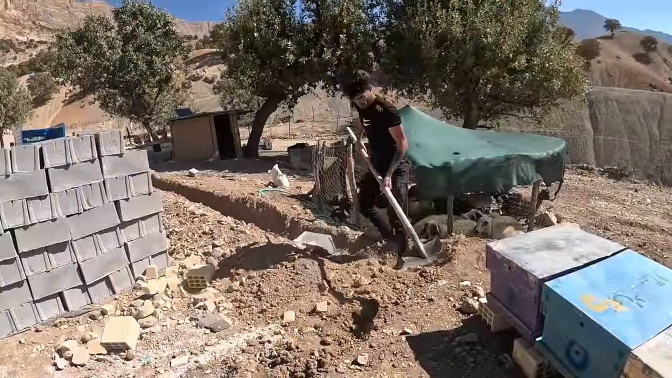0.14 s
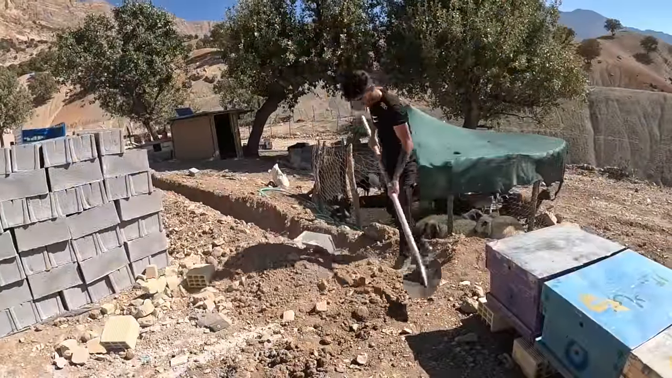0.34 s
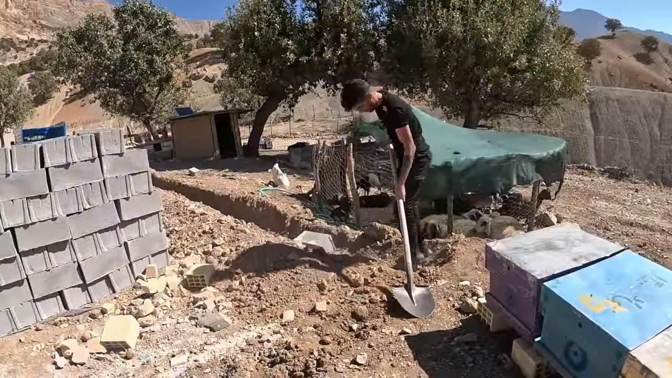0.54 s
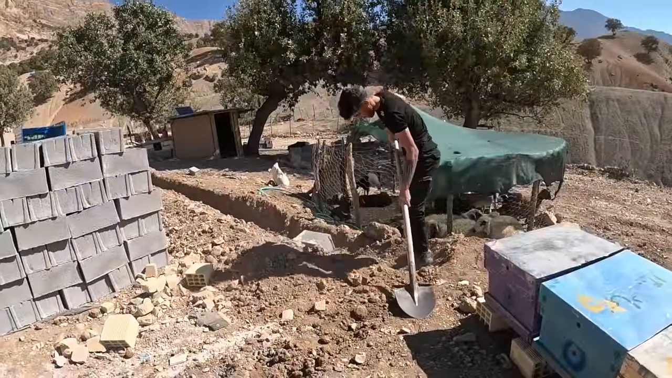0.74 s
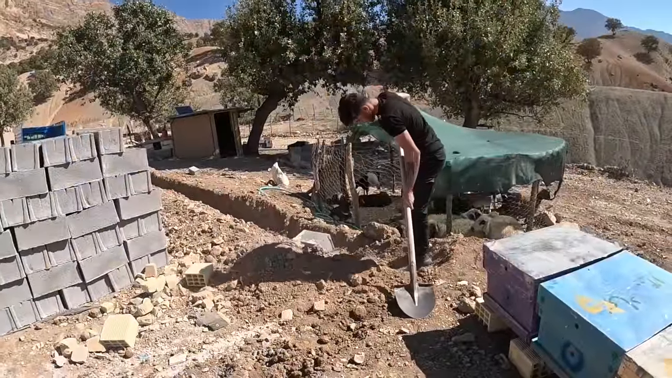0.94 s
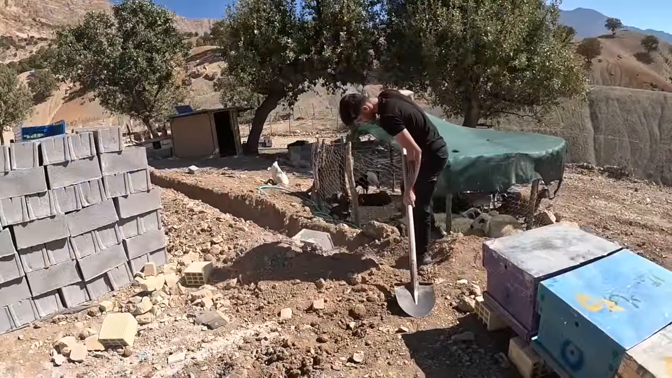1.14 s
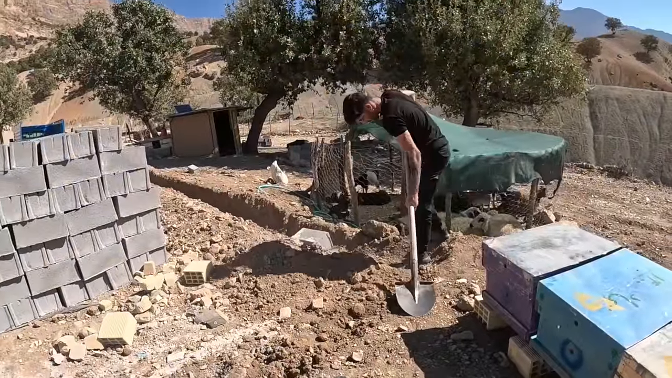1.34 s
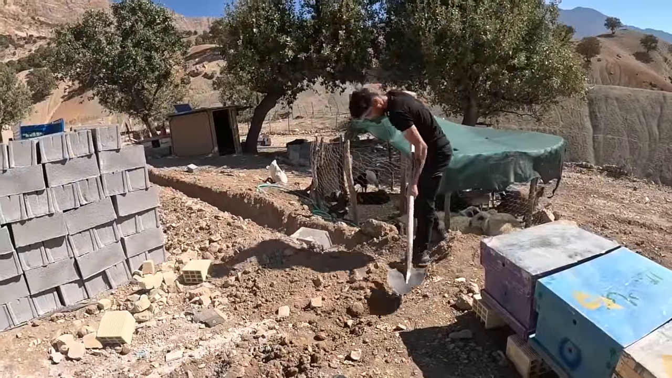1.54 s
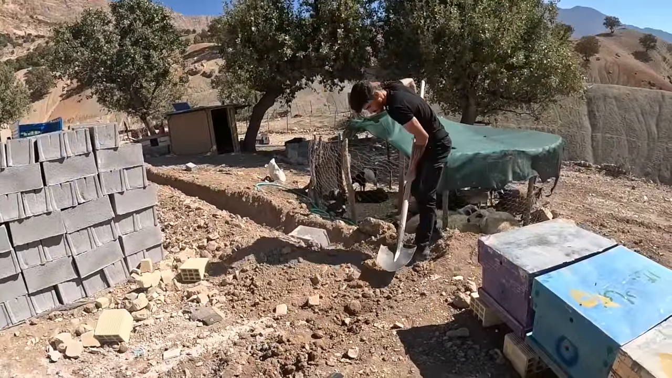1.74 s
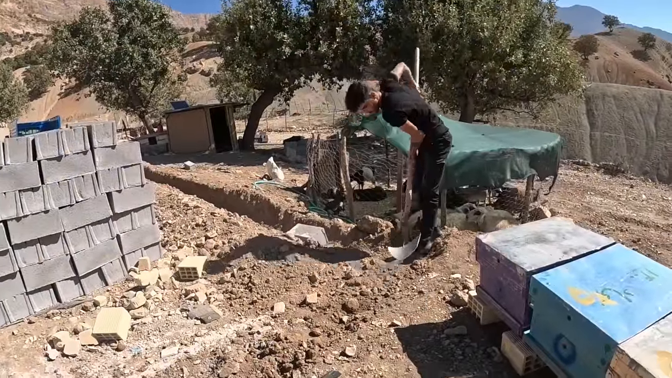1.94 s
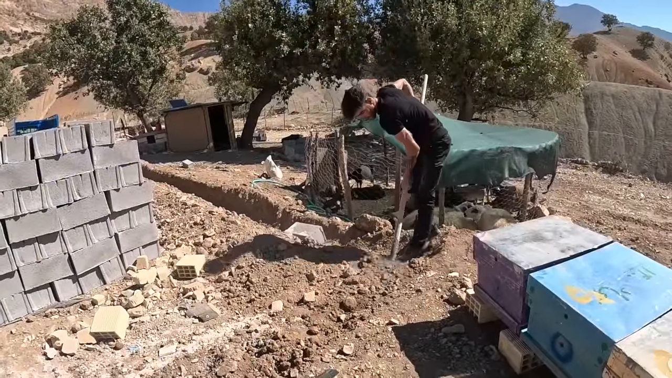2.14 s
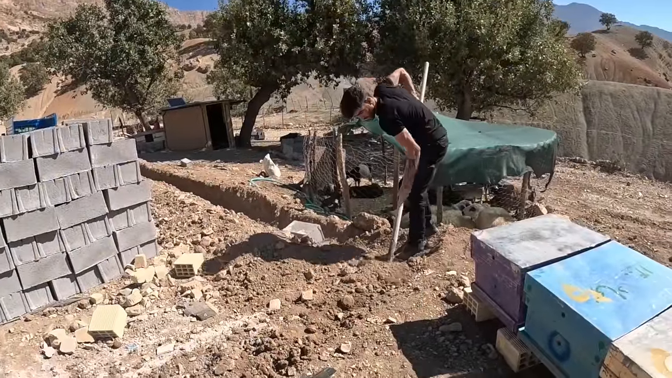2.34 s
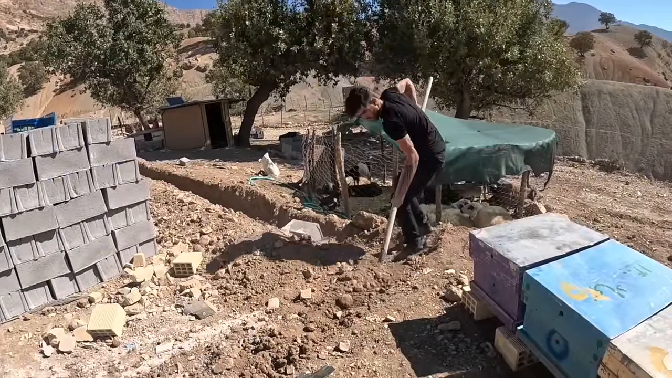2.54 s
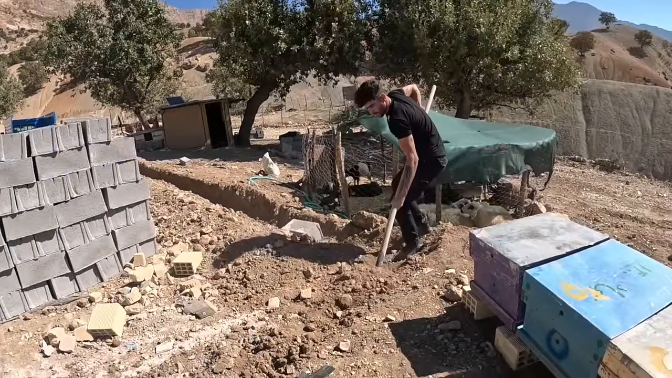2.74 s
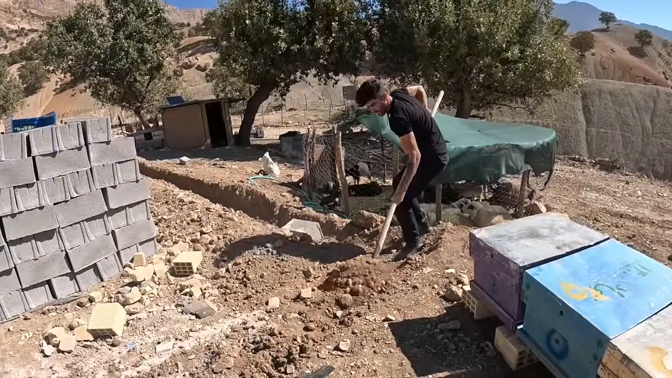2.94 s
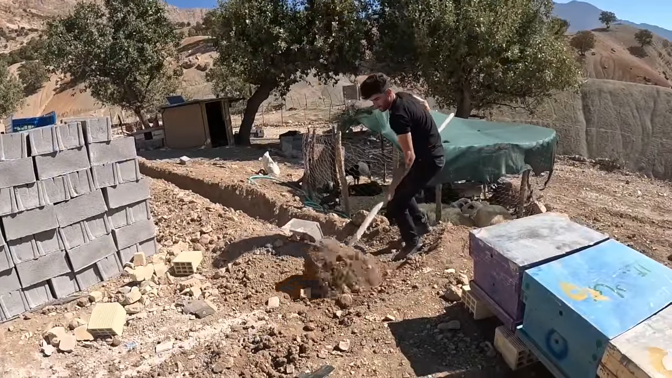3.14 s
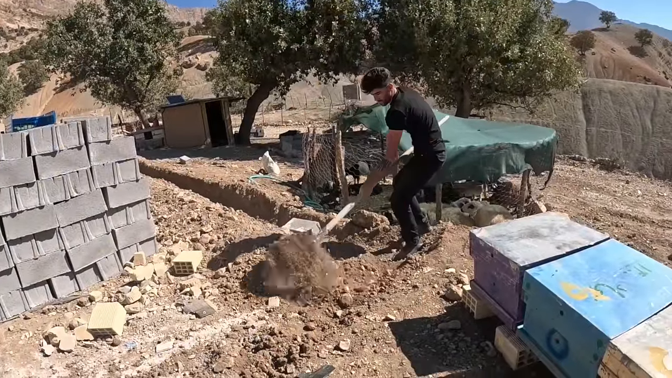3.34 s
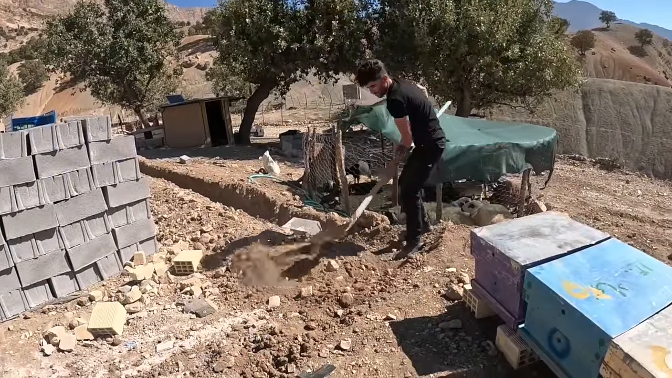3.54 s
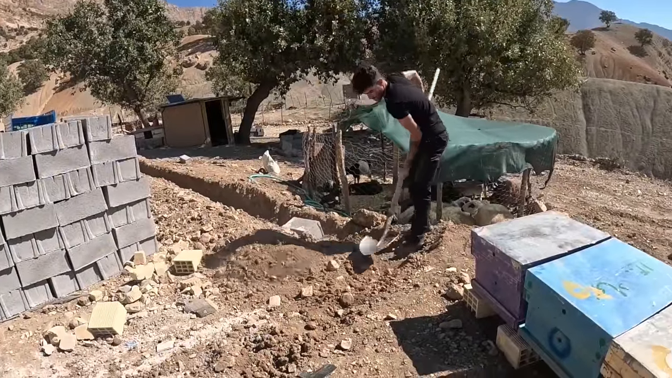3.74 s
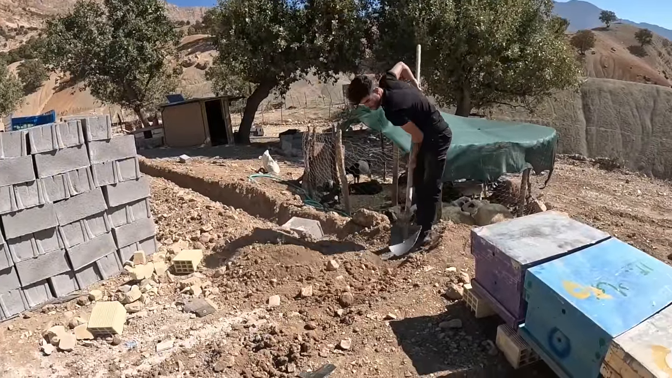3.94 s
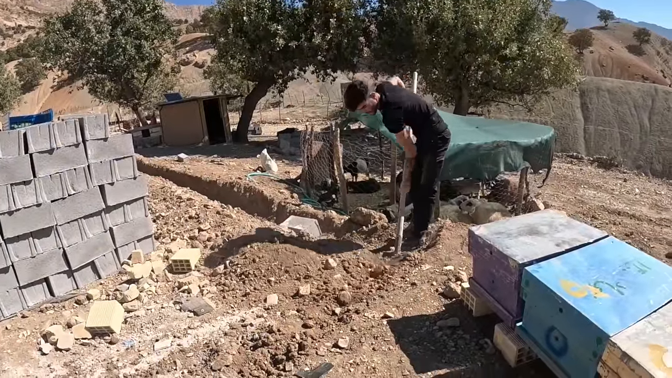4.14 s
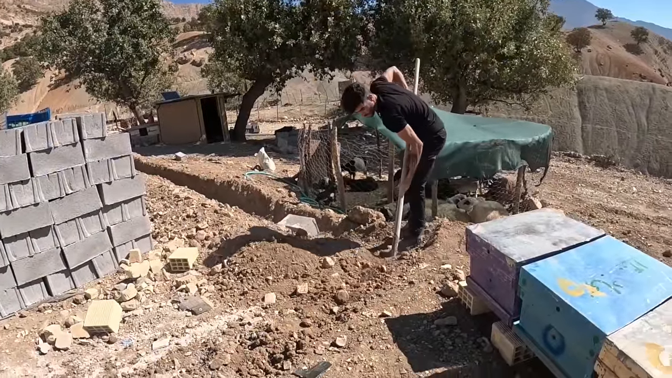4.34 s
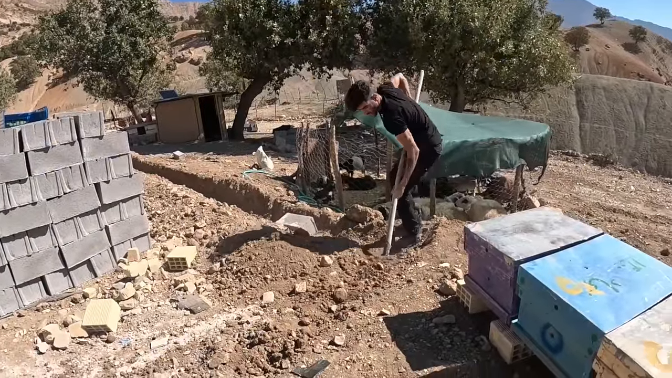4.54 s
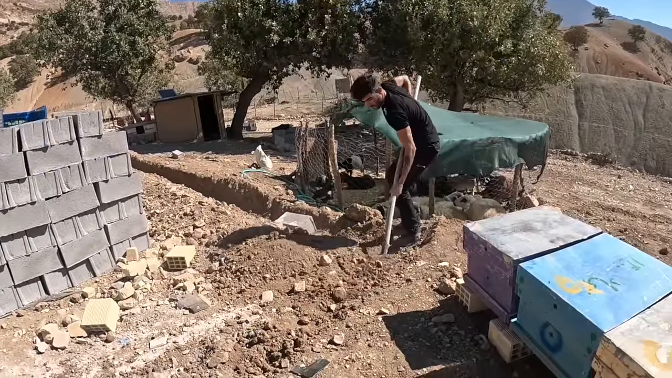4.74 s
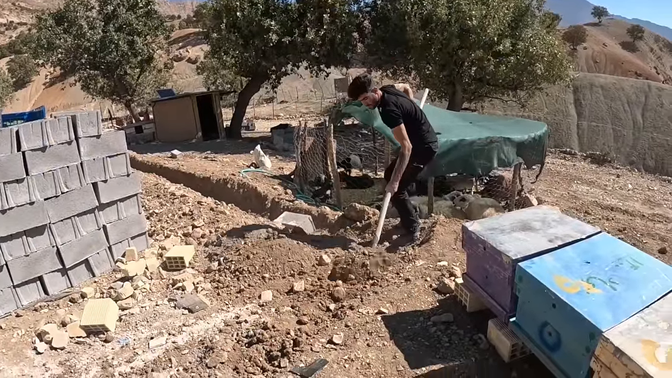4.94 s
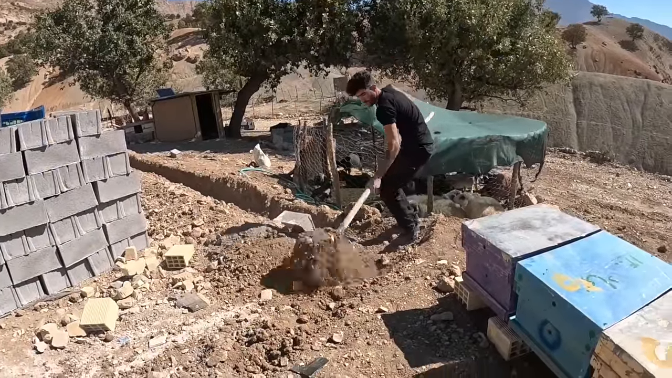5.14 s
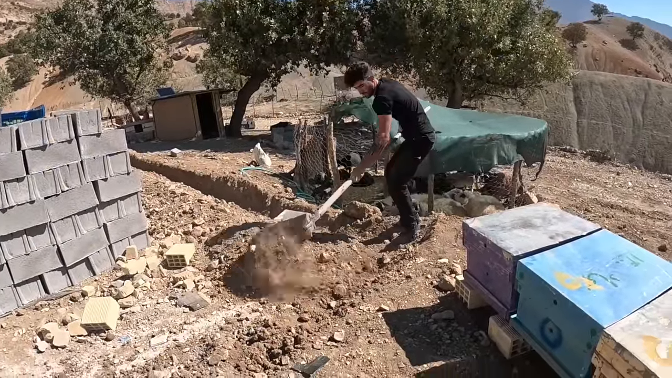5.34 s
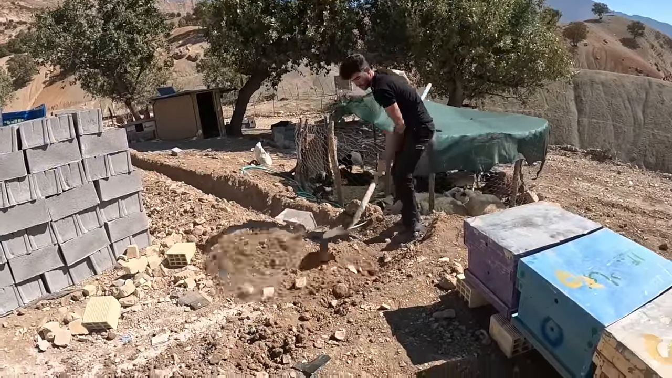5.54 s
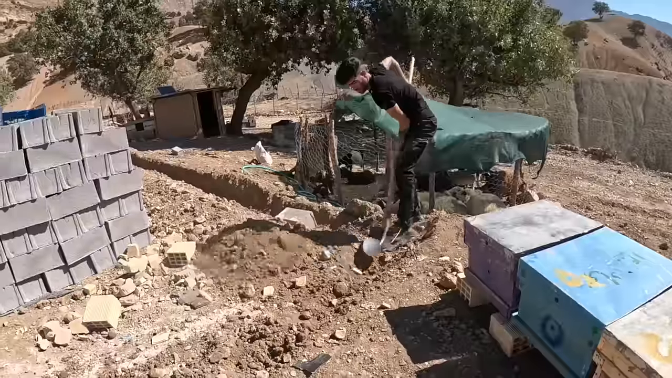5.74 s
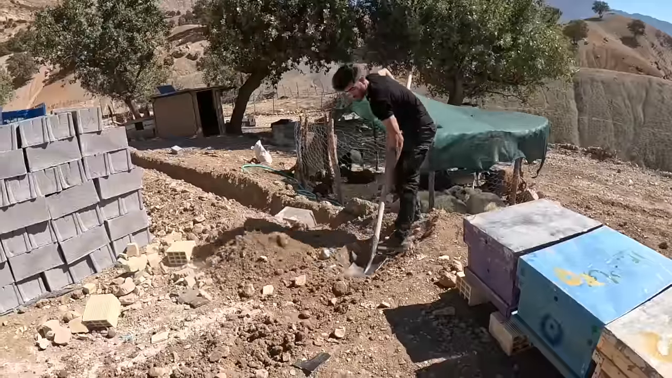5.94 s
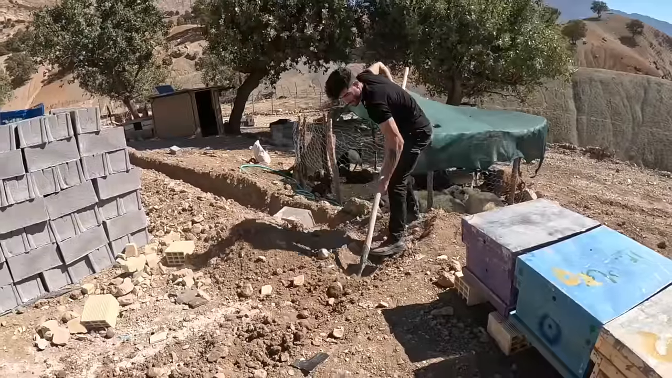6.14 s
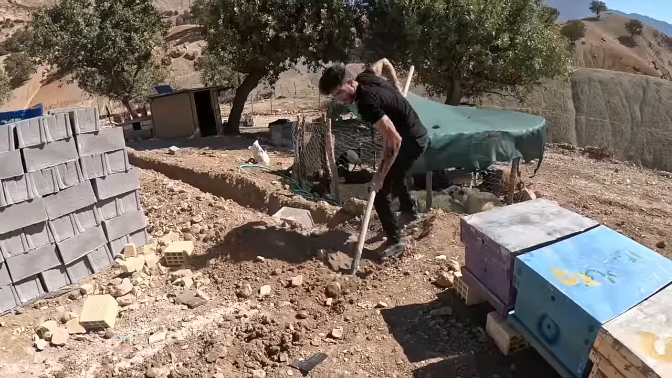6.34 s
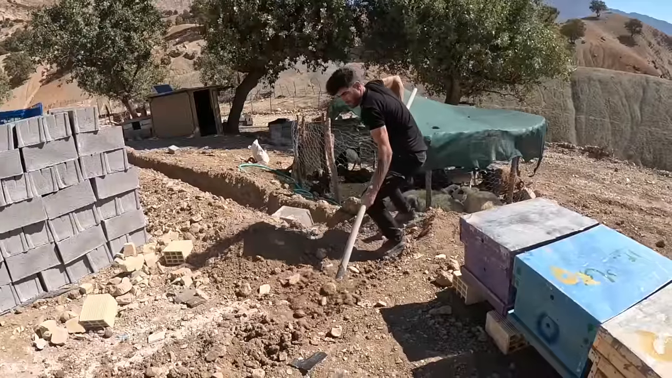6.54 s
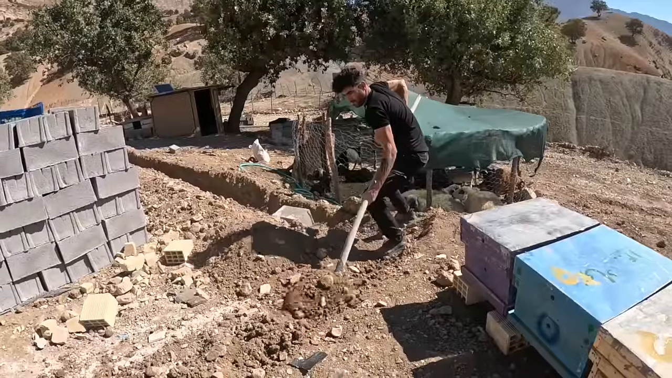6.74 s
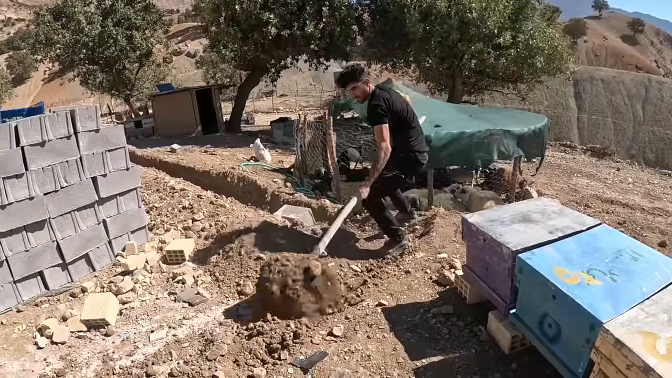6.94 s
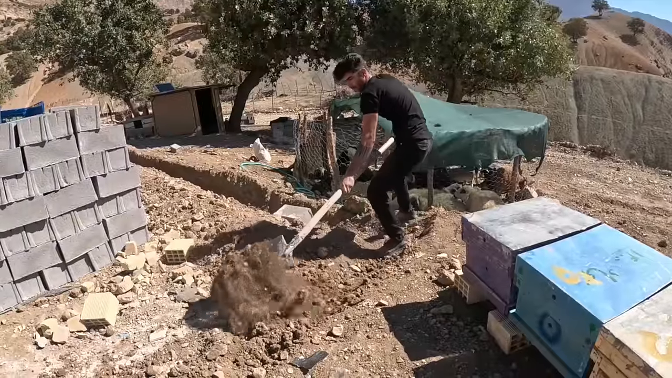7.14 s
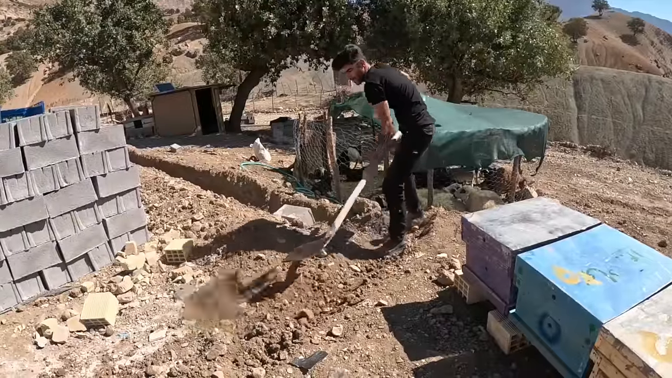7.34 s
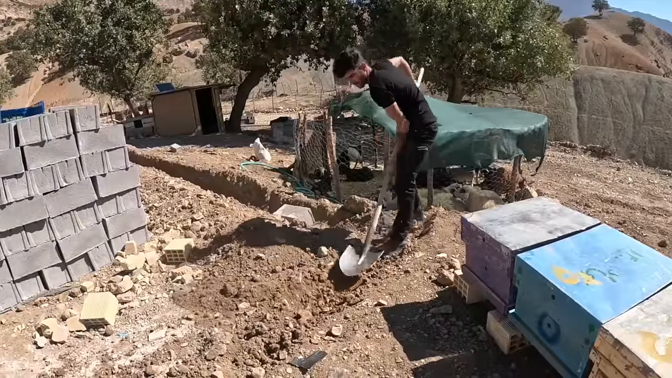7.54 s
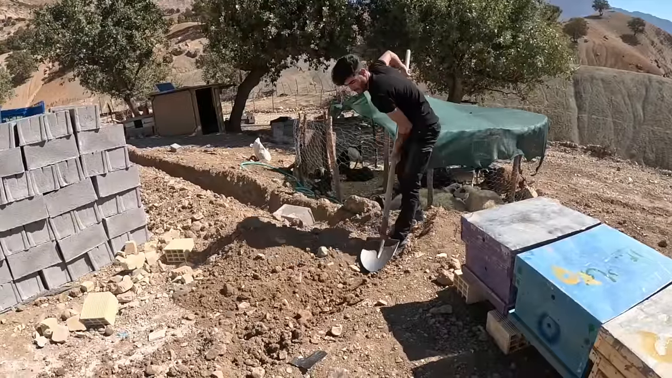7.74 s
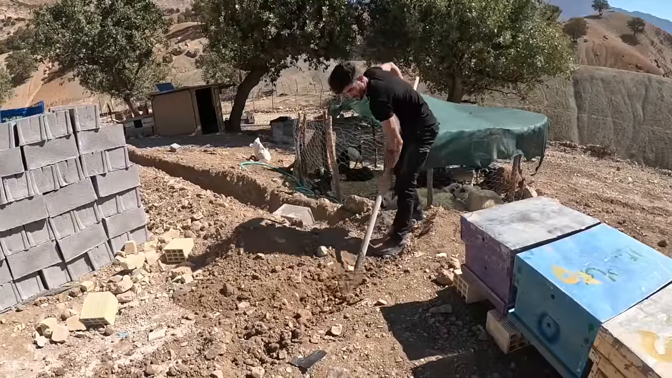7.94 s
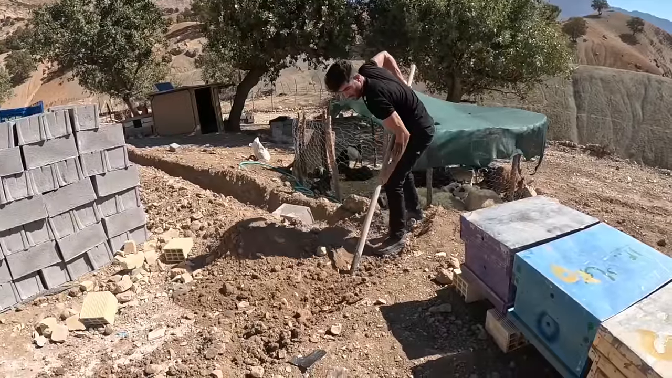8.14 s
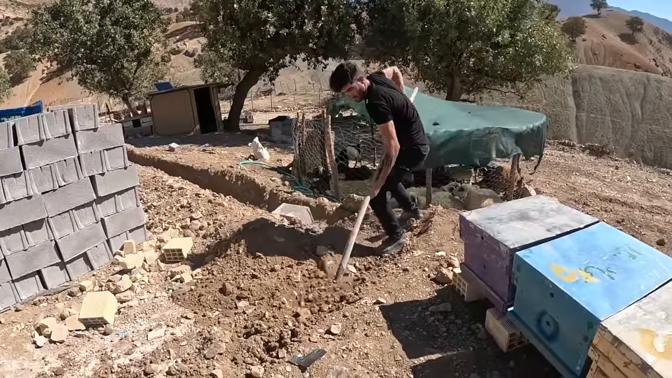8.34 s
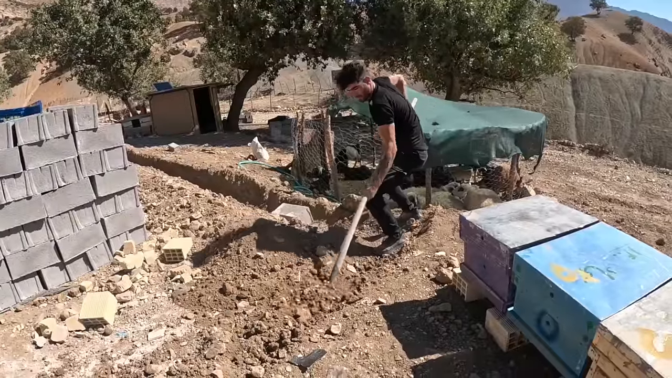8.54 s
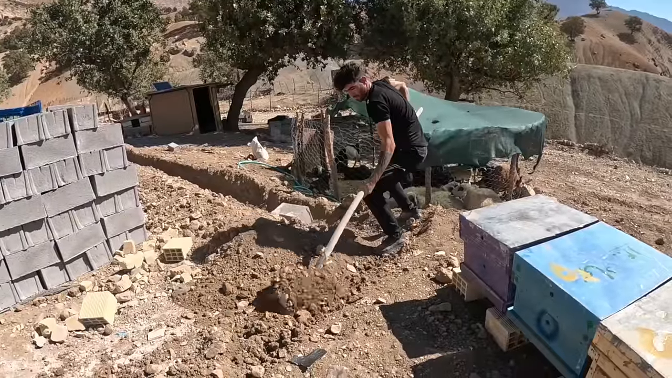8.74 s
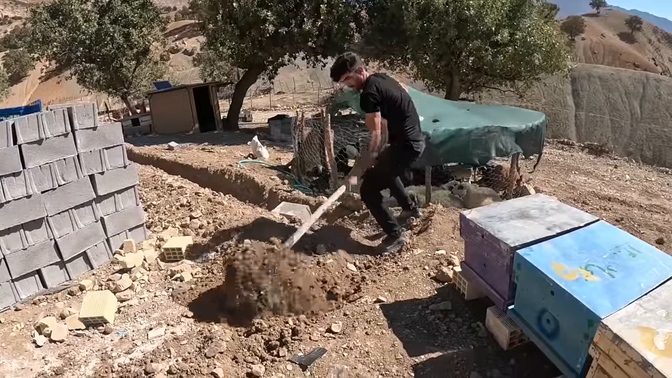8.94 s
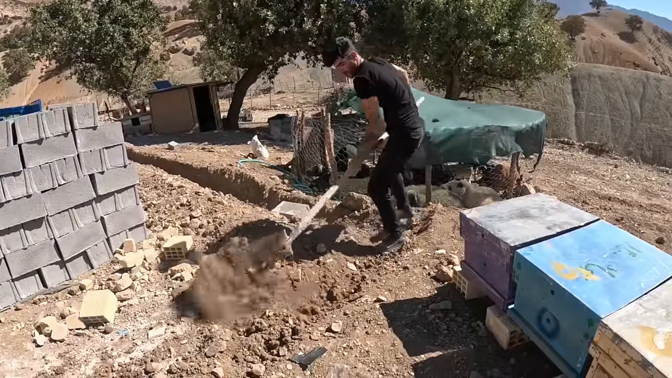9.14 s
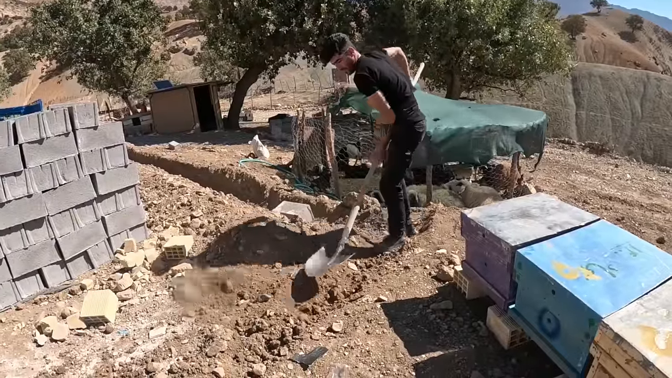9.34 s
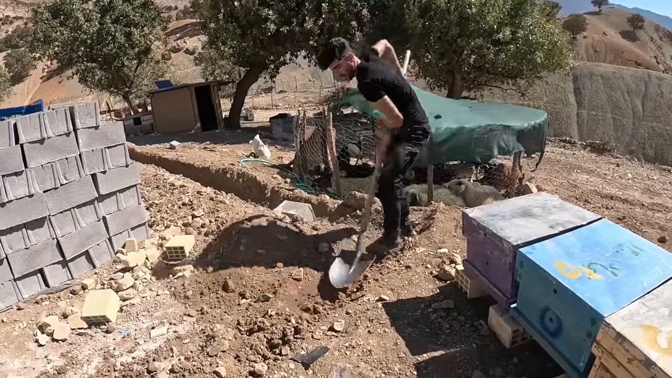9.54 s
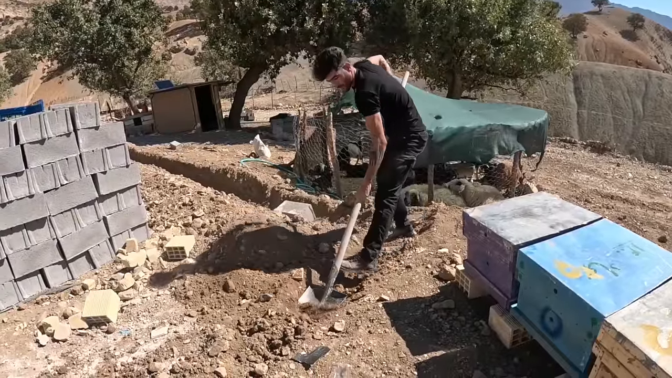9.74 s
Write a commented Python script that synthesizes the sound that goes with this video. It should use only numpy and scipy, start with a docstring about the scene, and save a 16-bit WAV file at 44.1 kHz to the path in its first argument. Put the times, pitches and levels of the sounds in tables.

```python
"""In an open yard a steel shovel is driven six times into dry stony ground.
Impacts are decaying noise bursts through stone and earth resonances; the blade is a sum of decaying modes.
Sliding, levered and thrown soil is a stream of random fractures, filtered as grit and clods.
Filtered noise gives the wind buffeting the microphone and a faint outdoor hush with wavering tones."""
import sys
import numpy as np
from scipy import signal
from scipy.fft import rfft, irfft
from scipy.io import wavfile
from scipy.ndimage import uniform_filter1d

SR = 44100
rng = np.random.default_rng(int(sys.argv[2]) if len(sys.argv) > 2 else 0)


def generate_wav(sig):
    """Save sig (samples, or channels by samples) to the path in sys.argv[1] as 16-bit PCM at SR."""
    pcm = np.round(np.clip(np.atleast_2d(sig).T, -1, 1) * 32767).astype(np.int16)
    wavfile.write(sys.argv[1], SR, pcm)


N = 436149
TIME = np.arange(N) / SR  # s

# Levels in the tables are relative: each source adds its own trim.
# wind rumble on the microphone: t/s, level/dB
WIND = [(0.0, -32), (0.47, -37.5), (0.99, -44), (1.27, -38.5), (1.46, -43.5), (2.5, -40.5), (3.0, -50),
        (3.11, -43.5), (3.41, -52), (3.91, -39), (4.65, -46), (4.74, -41.5), (5.59, -48), (5.67, -46),
        (6.2, -45.5), (6.44, -44.5), (6.53, -29.5), (6.67, -48.5), (7.24, -39.5), (7.77, -46.5),
        (7.99, -38), (8.18, -41.5), (8.81, -39.5), (9.06, -41.5), (9.12, -37), (9.75, -38.5), (9.89, -49)]
# gusts: t of middle/s, length/s, buffeting level/dB, higher flutter level/dB
GUSTS = [(0.194, 0.16, -30.5, -44.5), (0.402, .07, -34, -44), (0.516, 0.075, -29, -43),
         (1.283, 0.068, -37, -58), (2.21, .06, -35.5, -48), (4.376, 0.19, -38, -41),
         (5.154, 0.028, -30, -52), (5.802, 0.27, -44, -63.5), (6.537, 0.09, -40.5, -66),
         (6.858, 0.076, -43.5, -74), (8.014, 0.16, -40.5, -50.5), (8.743, 0.21, -41.5, -64),
         (8.945, 0.033, -31, -51), (9.173, 0.049, -31, -53), (9.367, .12, -38, -49)]
BUFFET_UNDER_RUMBLE_DB, FLUTTER_UNDER_RUMBLE_DB = -10.5, -35
# faint far tones, each a short glide of rows: t/s, f/Hz, level/dB
TONES = [
    [(1.2, 1228, -79), (1.3, 1280, -59), (1.4, 1330, -71)],
    [(1.6, 1640, -70), (1.9, 1560, -78), (2.14, 1470, -70.5)],
    [(2.56, 277, -68), (2.576, 277, -50), (2.698, 277, -51), (2.85, 306.5, -51), (2.95, 342, -52),
     (3.264, 412, -55.5), (3.4, 428.6, -67)],
]
# boots and blade brush the loose surface: t of start/s, length/s, grit level/dB, clods level/dB
SCUFFS = [(.39, 0.038, -68.5, -54.5), (.8, 0.034, -64.5, -57), (1.3, 0.066, -79, -56.5),
          (1.55, 0.11, -65.5, -63.5), (1.85, 0.29, -79, -65), (2.78, 0.2, -68, -66.5),
          (3.15, 0.19, -67, -69), (3.85, 0.19, -75.5, -63.5), (5.13, 0.064, -65, -69),
          (5.71, 0.026, -57, -60.5), (5.81, 0.15, -59, -64.5), (6.935, 0.018, -62, -82),
          (7.89, 0.024, -45, -70), (8.99, 0.035, -60, -79), (9.73, .025, -48.5, -62)]
SCUFF_RISE_DB_PER_S, SCUFF_FALL_DB_PER_S = 593, 219.5
# blade meets a buried stone: t/s, level/dB, earth level/dB, crack t60/s, f of the stone/Hz
BLOWS = [(0.5322, -7, -45.5, 0.05, 6300), (0.5383, -6.5, -33.5, 0.022, 4387),
         (2.1755, -9.5, -36, 0.04, 3480), (2.197, -5, -10, .045, 1861), (2.222, -17, -17.5, 0.12, 3020),
         (2.2655, -18.5, -18.5, 0.033, 2230), (4.130, -10.5, -29.5, .05, 3410),
         (4.1425, -9, -28, 0.089, 3820), (4.186, -13.5, -18.5, 0.14, 3400),
         (4.2457, -25.5, -18, 0.051, 1600), (6.049, -9, -22.5, .045, 2700), (6.056, -8, -23.5, 0.081, 3800),
         (6.082, -12, -22, 0.022, 2760), (7.913, -14.5, -37, .046, 4100), (7.922, -8.5, -27, 0.061, 2850),
         (7.9367, -16.5, -26, 0.11, 3700), (7.9793, -15.5, -23.5, 0.11, 2700),
         (8.0372, -10, -22.5, 0.017, 2070), (9.7575, -12, -27, 0.033, 3480), (9.769, -8.5, -9, 0.073, 3350),
         (9.796, -15.5, -21, 0.06, 4350)]
THUD_HZ, THUD_OVER_EARTH_DB = 480, 6  # the ground under a blow
# stone knocks the free blade: t/s, level/dB, ring level re knock/dB, place (edge 0, face 1), damping factor
CLINKS = [(.539, -21.5, -8, 0.2, 1.44), (.622, -18.5, -8, 0.05, 1.25), (.683, -32.5, 2, .02, 2.4),
          (5.456, -35, -13, 0.8, 1.5), (5.511, -35.5, 1.5, 1, 1.13), (7.561, -48.5, 5, 0.67, 0.69),
          (9.228, -26, 4, 1, 1.13), (9.246, -28, -1, 0.93, 0.95)]
# blade slides through soil: t of start/s, length/s, crunch level/dB, body level re crunch/dB,
# fading over the stroke/dB, trickle level afterwards/dB
STABS = [(0.552, 0.016, -29, -13.5, 22, -66.5), (.612, 0.061, -39, -9, 8.5, -55),
         (2.168, 0.13, -31.5, -1, 7, -54.5), (4.126, .13, -32, 0.5, 6, -50.5),
         (6.045, 0.14, -27.5, -1, 23, -64), (7.911, 0.16, -28.5, 0.5, 7.5, -55),
         (9.759, .093, -24, 2, 16.5, -58)]
TRICKLE_DB_PER_S = 88.5  # crumbs run back into the cut and come to rest
# knocks of shaft, boots and loosened lumps on packed earth: t/s, level/dB, f/Hz
THUDS = [(.803, -28, 464), (5.075, -27.5, 450), (5.147, -19, 440), (6.504, -16, 100), (6.595, -27.5, 486),
         (8.824, -38, 400)]
# single larger pebbles: t/s, level/dB, f/Hz
PEBBLES = [(2.5283, -41.5, 2140), (2.6473, -30.5, 3320), (4.575, -34, 1310), (5.5303, -27.5, 2840),
           (5.618, -26.5, 3520), (5.719, -33, 2240), (5.815, -34, 4010), (5.835, -32, 1316),
           (6.126, -23.5, 3810), (6.428, -27.5, 4290), (6.4559, -17.5, 1190), (6.479, -18.5, 2800),
           (6.5033, -21.5, 2600), (6.9359, -32.5, 4570), (7.36, -30.5, 3240), (7.3838, -18.5, 1090),
           (7.3937, -24, 1500), (7.437, -20, 3760), (7.456, -28.5, 910), (7.534, -36.5, 3730),
           (7.6154, -30.5, 1180), (7.746, -38.5, 6030), (7.8568, -35, 5990), (8.824, -39.5, 2450)]
# the buried blade prises soil loose: t of start/s, length/s, grit level/dB, clods level/dB
LEVERS = [(2.54, .11, -51, -49.5), (4.35, 0.069, -58, -52.5), (4.57, 0.023, -52.5, -49.5),
          (6.435, 0.06, -43, -45.5), (8.36, 0.062, -52, -47)]
LEVER_RISE_DB_PER_S, LEVER_FALL_DB_PER_S = 297.5, 182
# sand slides off the blade and clods tumble, each at its own time: t of start/s, length/s, sand level/dB,
# t of clods/s, clods level/dB, level of the singing blade/dB, its place (edge 0, face 1)
THROWS = [(3.466, 0.088, -48, 3.8, -72.5, -67.5, 0.56), (5.422, 0.13, -48, 4.85, -62, -55.5, 0.74),
          (7.201, 0.36, -47.5, 7.44, -47, -52.5, 0.57), (9.175, 0.35, -48, 9.325, -45.5, -58, 1)]
THROW_RISE_DB_PER_S, THROW_FALL_DB_PER_S = 136.5, 97
TUMBLE_S, CLODS_SETTLE_DB_PER_S = 0.1, 171.5
EMPTYING_S = 0.11  # the blade can sing only as the last of the load leaves it
# modes of the steel blade: f/Hz, level knocked on edge/dB, level knocked on face/dB, t60 at damping 1/s
BLADE = [(1379, -9, 4, 0.15), (1442, -5, -1.5, 0.33), (1840, -11, -12, .13), (1916, -22, 2, 0.43),
         (2106, -2, -17.5, 0.54), (2183, -5.5, -15, 0.13), (2453, -6.5, -3.5, 0.21),
         (2570, -10.5, -2, 0.064), (2740, -4, -9.5, 0.31), (2850, -7, 1, .28), (2955, -5, -11.5, 0.25),
         (3000, -8, -15, 0.27), (3230, -7.5, -3, .3), (3380, -1, -14, 0.35), (3440, -8, -0.5, .4),
         (3870, -1.5, -12.5, 0.22), (3950, -5.5, -8.5, 0.25), (4280, -14.5, -3.5, .35),
         (4500, -5, -9.5, 0.28), (5160, -7, -13.5, 0.15), (5700, -6, -11, 0.19), (5780, -6.5, -12.5, 0.27),
         (6300, -8, -16, .17), (7310, -5, -17, 0.27)]
# spectrum of a stone contact: f/Hz, level/dB
CRACK = [(300, -31.5), (900, -19.5), (1500, 3), (2800, 8), (4000, 6.5), (5200, 3), (6500, 2.5), (16000, -3)]
# spectrum of moving grit: f/Hz, level/dB
GRIT = [(300, -32.5), (900, -6.5), (1600, -3), (2900, 2), (4200, -0.5), (6000, -3.5), (9000, -7),
        (16000, -6)]
# spectrum of breaking clods and struck earth: f/Hz, level/dB
CLODS = [(30, -42.5), (110, -14), (250, -3), (470, 3), (750, -1.5), (1100, -6), (1800, -10.5), (4000, -45)]
# spectrum of the wind's rumble: f/Hz, level/dB
RUMBLE = [(4, -33), (14, -7.5), (25, -0.5), (45, -4.5), (75, -4.5), (120, -13.5), (250, -29), (600, -63)]
# spectrum of gusts buffeting the microphone: f/Hz, level/dB
BUFFET = [(50, -18.5), (100, -3), (155, 4.5), (230, -3.5), (330, -15.5), (500, -31.5), (1200, -59.5)]
# spectrum of the outdoor hush: f/Hz, level/dB
HUSH = [(60, -2), (250, -2.5), (470, 1.5), (800, -15.5), (1500, -12.5), (3200, -18.5), (6000, -27.5),
        (16000, -40.5)]
# response of the microphone: f/Hz, level/dB
MICROPHONE = [(20, 1.5), (6300, -2.5), (7100, -10.5), (8200, -21), (10000, -14), (13800, -19.5),
              (15500, -33)]
TOP_HZ = 15400  # upper limit of the recorder


def undb(db):
    """Logarithmic level: decibels to amplitude gain."""
    return 10 ** (np.asarray(db) / 20)


def unit(x):
    """Normalization of power: scale to rms 1."""
    return x / np.sqrt(np.mean(x ** 2))


def peak(x, db):
    """Normalization of amplitude: scale to a peak level."""
    return x * undb(db) / np.abs(x).max()


def fade(t60, size=SR // 5):
    """Exponential decay: the level falls 60 dB in t60 seconds."""
    return np.exp(-np.log(1000) * TIME[:size] / max(t60, 1e-3))


def add(track, s, sound):
    """Superposition: mix a sound into a track at time s."""
    i = int(s * SR)
    track[i:i + len(sound)] += sound[:N - i]


def colour(x, points, size=4096):
    """Minimum-phase filtering: a causal response with the given spectrum, f/Hz and level/dB."""
    hz, db = np.transpose(points)
    bins = np.maximum(np.fft.rfftfreq(size, 1 / SR), 1)
    log_gain = np.log(undb(np.interp(np.log(bins), np.log(hz), db)))
    cepstrum = irfft(log_gain)
    # folding the cepstrum onto positive time makes the response causal
    cepstrum[1:size // 2] *= 2
    cepstrum[size // 2 + 1:] = 0
    response = irfft(np.exp(rfft(cepstrum)))
    return signal.oaconvolve(x, response)[:len(x)]


def resonate(x, hz, q):
    """Simple resonance: one broad peak of quality factor q."""
    return signal.lfilter(*signal.iirpeak(min(hz, SR / 4), max(q, .6), fs=SR), x)


def walk(rate):
    """Random modulation: random steps, rate a second, smoothed twice and scaled to rms 1."""
    k = int(SR / rate)
    steps = np.repeat(rng.standard_normal(N // k + 1), k)
    smooth = uniform_filter1d(uniform_filter1d(steps, k), k)
    return unit(smooth[:N])


def grains(rate, spread_db):
    """Random point process: tiny fractures, rate a second, many small and a few large."""
    chance, size = rng.random(N), rng.standard_exponential(N)
    at = np.flatnonzero(chance < rate / SR)
    sign = (-1.) ** at
    out = np.zeros(N)
    out[at] = sign * undb(spread_db * np.minimum(size[at], 4))
    return unit(out)


def rubble(rate, spread_db, q, count=8):
    """Resonance by size: stones of several sizes tick at their own pitches and moments."""
    pitches = np.geomspace(1100, 9000, count)
    return unit(sum(resonate(grains(rate / count, spread_db), hz, q) / np.sqrt(hz) for hz in pitches))


def crack(t60, scatter, rise=.0015):
    """Impulsive contact: one impulse amid crumbling noise that swells and dies."""
    decay = fade(t60)
    onset = 1 - np.exp(-TIME[:len(decay)] / rise)
    burst = scatter * rng.standard_normal(len(decay)) * decay * onset
    burst[int(rise * SR / 2)] += 1
    return burst


def thud(db, hz):
    """Soft contact: a heavy, slow push sounds only a few low cycles."""
    push = resonate(crack(0.039, scatter=0.15, rise=0.0033), hz, q=1)
    lowpass = signal.butter(4, 1.68 * hz, fs=SR, output="sos")
    return peak(signal.sosfilt(lowpass, push), db - 8)


def blade(place, damping):
    """Modal superposition: the place of contact weights the modes and damping shortens them."""
    ring = 0
    for hz, edge_db, face_db, t60 in BLADE:
        decay = fade(t60 / damping, size=int(.5 * SR / damping))
        gain = undb(np.interp(place, [0, 1], [edge_db, face_db])) * rng.choice([-1, 1])
        ring = ring + gain * decay * np.sin(2 * np.pi * hz * TIME[:len(decay)])
    return ring


def scrape(force, place, damping):
    """Forced vibration: grit rubbing on the blade keeps its modes sounding."""
    ring = blade(place, damping)
    return signal.fftconvolve(force, ring / np.linalg.norm(ring))[:N]


def swell(s, length, rise, fall):
    """Exponential envelope: rise, hold and fall, with slopes in dB a second."""
    out = np.zeros(N)
    near = slice(int(max(s - .4, 0) * SR), int((s + length + .6) * SR))
    t = TIME[near]
    before, after = np.maximum(s - t, 0), np.maximum(t - s - length, 0)
    out[near] = undb(-rise * before - fall * after)
    return out


def wind():
    """Turbulent pressure: eddies rumble on the microphone; gusts buffet it and flutter higher."""
    rumble_db = np.interp(TIME, *np.transpose(WIND))
    buffeting = undb(rumble_db + BUFFET_UNDER_RUMBLE_DB)
    fluttering = undb(rumble_db + FLUTTER_UNDER_RUMBLE_DB)
    for s, length, db, flutter_db in GUSTS:
        near = np.abs(TIME - s) < 2 * length
        gust = np.exp(-(2 * (TIME[near] - s) / length) ** 2)
        buffeting[near] = np.hypot(buffeting[near], undb(db) * gust)  # powers add
        fluttering[near] += undb(flutter_db) * gust
    rumble = unit(colour(rng.standard_normal(N), RUMBLE)) * undb(rumble_db + 0.23 + 1.0 * walk(5.2))
    buffet = unit(colour(rng.standard_normal(N), BUFFET)) * buffeting * undb(3.2 * walk(35))
    flutter = unit(resonate(resonate(rng.standard_normal(N), 310, q=2.0), 310, q=2.0))
    return rumble + buffet + flutter * fluttering * undb(-2.0 + 2.5 * walk(50))


def distance():
    """Diffuse background: filtered noise hushes, with frequency-modulated faint tones over it."""
    out = unit(colour(rng.standard_normal(N), HUSH)) * undb(-63.5 + 1.9 * walk(4.1))
    waver, swell_db = 1 + 0.0082 * walk(47), 2.9 * walk(25.25)
    for rows in TONES:
        s, hz, db = np.transpose(rows)
        phase = 2 * np.pi * np.cumsum(np.interp(TIME, s, hz) * waver) / SR
        inside = 1. * ((TIME > s[0]) & (TIME < s[-1]))
        sounding = uniform_filter1d(inside, SR // 50)  # softens the ends
        out = out + sounding * np.sin(phase) * undb(np.interp(TIME, s, db) + swell_db)
    return out


def soil_flow():
    """Granular flow: how strongly grit and clods move in trickles, scuffs, levering and throws."""
    fine, coarse = np.zeros((2, N))
    for s, length, *_, trickle_db in STABS:
        trickle = undb(trickle_db) * swell(s + length, 0, 900, TRICKLE_DB_PER_S)
        fine += trickle
        coarse += undb(-5.5) * trickle
    for rows, rise, fall in [(LEVERS, LEVER_RISE_DB_PER_S, LEVER_FALL_DB_PER_S),
                             (SCUFFS, SCUFF_RISE_DB_PER_S, SCUFF_FALL_DB_PER_S)]:
        for s, length, grit_db, clod_db in rows:
            moving = swell(s, length, rise, fall)
            fine += undb(grit_db) * moving
            coarse += undb(clod_db) * moving
    for s, length, sand_db, clods_s, clod_db, *_ in THROWS:
        fine += undb(sand_db) * swell(s, length, THROW_RISE_DB_PER_S, THROW_FALL_DB_PER_S)
        coarse += undb(clod_db) * swell(clods_s, TUMBLE_S, THROW_RISE_DB_PER_S, CLODS_SETTLE_DB_PER_S)
    return fine, coarse


def soil():
    """Granular noise: sand hisses, gravel patters, small pebbles tick and clods break as soil moves."""
    fine, coarse = soil_flow()
    sand = undb(0.5) * grains(rate=9000, spread_db=1.5)
    gravel = undb(-5) * rubble(rate=1300, spread_db=5.5, q=2.6)
    ticks = undb(-12.5) * rubble(rate=70, spread_db=5, q=3.1)
    clods = unit(colour(grains(rate=700, spread_db=1.5), CLODS))
    unevenness = undb(0.84 * walk(45))
    grit = fine * (unit(colour(sand + gravel, GRIT)) + ticks) * unevenness
    steel = scrape(grit, place=.8, damping=2.4)
    return grit + undb(-14.5) * steel + coarse * clods


def blows():
    """Impact excitation: edge cracks on stone, earth thuds and the buried blade rings briefly."""
    out = np.zeros(N)
    for s, db, earth_db, t60, hz in BLOWS:
        contact = colour(crack(t60, scatter=0.3, rise=.001), CRACK)
        # an irregular stone has a few short, close resonances
        modes = [(.76, -1.3), (1, 0.84), (1.22, -1.3)]  # f ratio, signed gain
        knock = sum(gain * resonate(contact, hz * ratio, q=6.4) for ratio, gain in modes)
        stone = peak(undb(-8.5) * contact + knock, db - .5)
        earth = peak(colour(crack(.04, scatter=.35), CLODS), earth_db - 3.5)
        add(out, s, stone + earth + thud(earth_db + THUD_OVER_EARTH_DB, THUD_HZ))
        add(out, s, peak(blade(rng.random(), damping=9.0), db - 6))
    return out


def clinks():
    """Free vibration: out of the soil the blade rings on after each knock."""
    out = np.zeros(N)
    for s, db, ring_db, place, damping in CLINKS:
        add(out, s, peak(colour(crack(0.084, scatter=0.65), CRACK), db))
        add(out, s, peak(blade(place, damping), db + ring_db))
    return out


def stabs():
    """Sliding friction: the blade brushes crumbs, then breaks grit along it, ever less as it slows."""
    fine, coarse = np.zeros(N), np.zeros(N)
    for s, length, db, body_db, fading_db, _ in STABS:
        since = TIME - s
        progress = np.clip(since / length, 0, 10)
        approach = np.exp(np.minimum(since, 0) / 0.0033)
        stop = 1 + progress ** 14  # cuts off steeply at the end of the stroke
        speed = approach * undb(db - fading_db * progress) / stop
        fine += speed
        coarse += speed * undb(body_db)
    grit = unit(resonate(colour(rubble(rate=2700, spread_db=4.0, q=4), GRIT), 3200, q=0.22))
    steel = scrape(fine * grains(rate=2500, spread_db=3), place=.6, damping=4)
    earth = unit(colour(grains(rate=1500, spread_db=1.0), CLODS))
    return undb(-1.5) * fine * grit + undb(-14.0) * steel + undb(-3.0) * coarse * earth


def thuds():
    """Heavily damped impact: dull knocks on packed earth between the strokes."""
    out = np.zeros(N)
    for s, db, hz in THUDS:
        add(out, s, thud(db, hz))
    return out


def pebbles():
    """Damped resonance: each pebble gives a dry tick at its own pitch."""
    out = np.zeros(N)
    for s, db, hz in PEBBLES:
        contact = crack(0.042, scatter=0.17, rise=.001)
        tick = resonate(contact, hz, q=2.7) + undb(-17.5) * colour(contact, GRIT)
        add(out, s, peak(tick, db))
    return out


def singing():
    """Friction excitation: the last grit of each load rubs the blade, which rings on freely."""
    rubbing = grains(rate=400, spread_db=1.0)
    out = np.zeros(N)
    for s, length, *_, db, place in THROWS:
        emptying = swell(s + length - EMPTYING_S, EMPTYING_S, 230, 194)
        out += scrape(rubbing * undb(db) * emptying, place, damping=1.1)
    return out


def yard(x, near_db, far_db, near_t60, far_t60):
    """Diffuse reflection: rough ground scatters a short tail; walls and trees a longer, coloured one."""
    onset = 1 - fade(0.11, size=SR)
    near = rng.standard_normal(SR) * fade(near_t60, size=SR) * onset
    far = rng.standard_normal(SR) * fade(far_t60, size=SR) * onset
    far = colour(far, [(100, 2), (600, -10.5), (3500, 0.0), (7000, -3), (14000, -13.5)])
    echo = undb(near_db) * near / np.linalg.norm(near) + undb(far_db) * far / np.linalg.norm(far)
    return x + signal.fftconvolve(x, echo)[:N]


def scene():
    """Mid-side stereo: all sound is central; chiefly the highest treble differs between the ears."""
    digging = soil() + blows() + clinks() + stabs() + thuds() + pebbles() + singing()
    reflected = yard(digging, near_db=-17, far_db=-27.5, near_t60=0.13, far_t60=0.52)
    mid = reflected + wind() + distance()
    treble_points = [(100, -62.5), (2000, -58.0), (6000, -35.5), (8500, -23.5), (10500, -6.5), (14000, 0)]
    treble = colour(mid, treble_points)
    scatter = rng.standard_normal(1024) * fade(.03, size=1024)
    side = signal.oaconvolve(treble, scatter / np.linalg.norm(scatter))[:N]
    return np.array([mid + side, mid - side])


def record(dry):
    """Band limiting: the small microphone weakens the treble, and the recorder cuts the top."""
    heard = np.array([colour(channel, MICROPHONE) for channel in dry])
    lowpass = signal.ellip(8, .2, 70, TOP_HZ, fs=SR, output="sos")
    return signal.sosfilt(lowpass, heard)


dry = scene()
out = record(dry)
generate_wav(out)
```